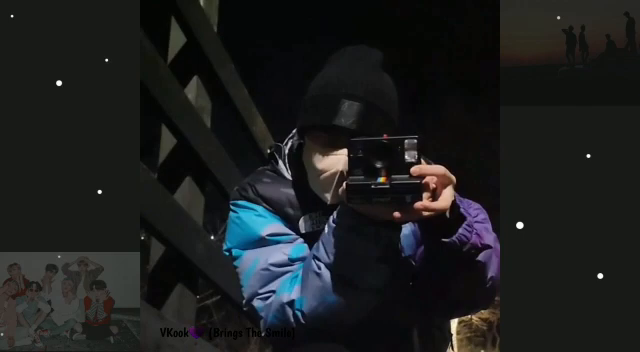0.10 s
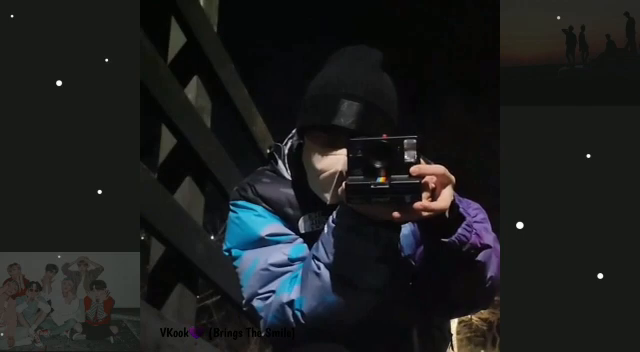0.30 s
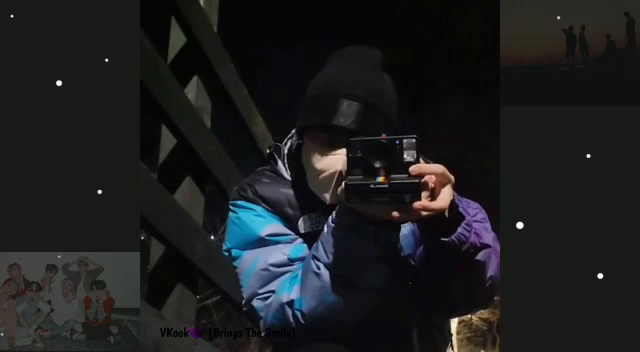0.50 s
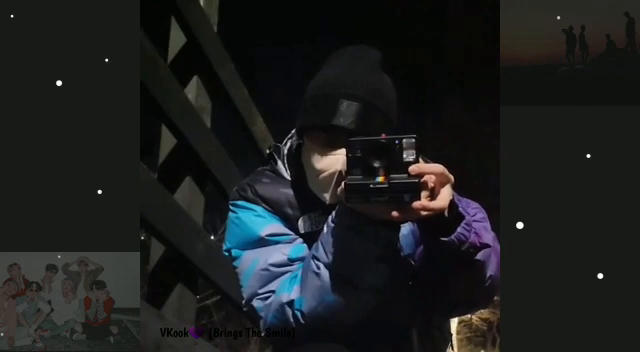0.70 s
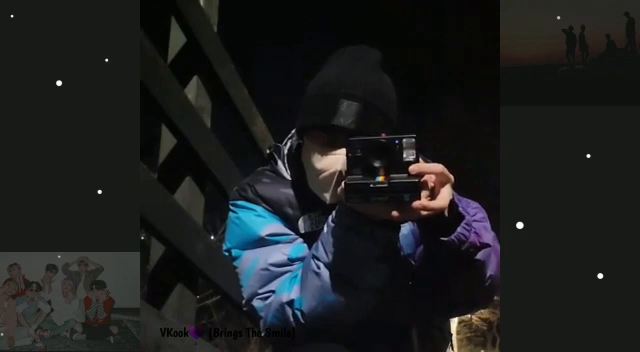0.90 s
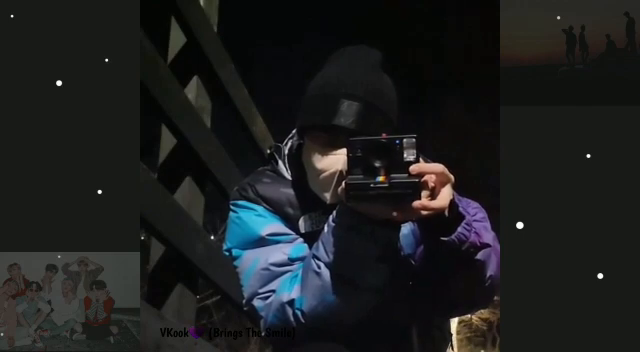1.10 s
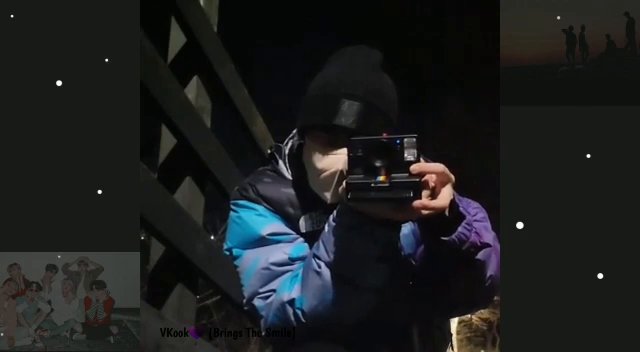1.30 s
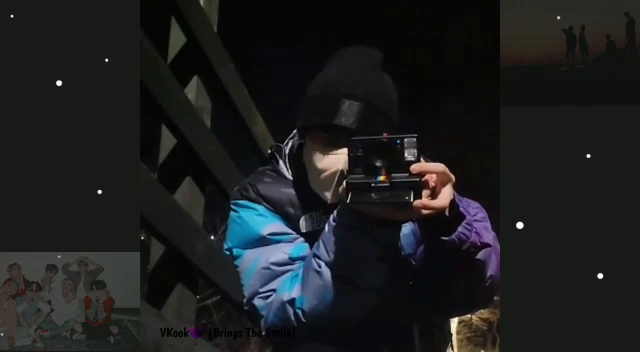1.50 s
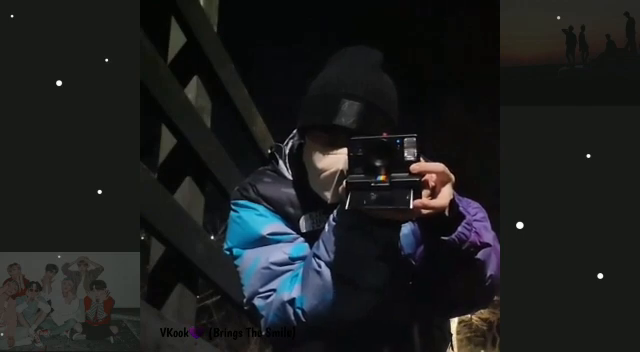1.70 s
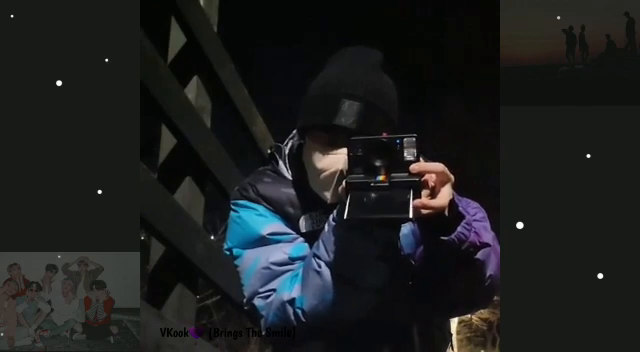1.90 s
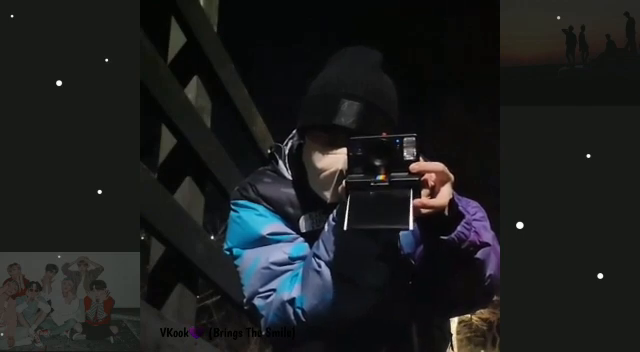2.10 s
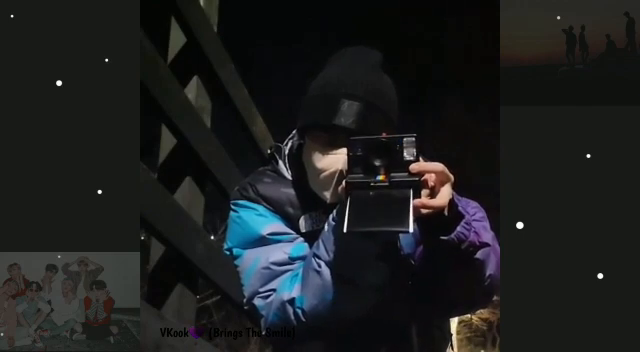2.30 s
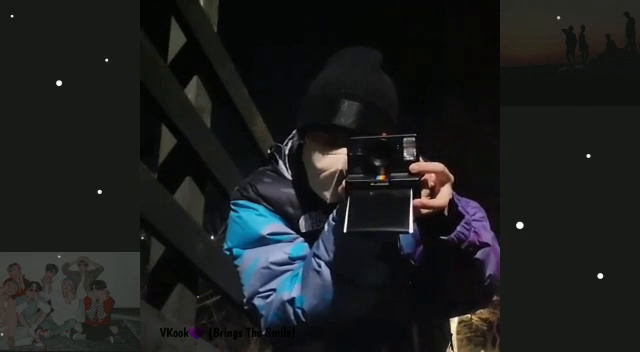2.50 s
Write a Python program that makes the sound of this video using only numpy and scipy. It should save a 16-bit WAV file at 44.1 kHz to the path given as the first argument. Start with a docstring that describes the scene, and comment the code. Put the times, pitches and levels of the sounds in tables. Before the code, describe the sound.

Instant camera ejecting a print: buzzy motor whine, sharp mechanical snap, lower strained whir, final clack

```python
"""A low outdoor rumble, then an instant camera's small geared motor spins up to a whine and ejects a print.
It labours as the rollers grip the print, presses it out, runs free and dies away: tooth harmonics,
gear lines, rattle and rubbing all follow one shaft speed and sound through the plastic case.
The mechanism snaps as the print is picked and clacks as it lets go: noise cracks plus ringing modes.
The distant rumble is filtered noise with low swells near 50 Hz, each a decaying sine."""
import sys
import numpy as np
from scipy import signal
from scipy.fft import rfft, irfft, next_fast_len
from scipy.io import wavfile

SR = 44100
rng = np.random.default_rng(int(sys.argv[2]) if len(sys.argv) > 2 else 0)


def wav_out(sig):
    """Save sig, one row per channel (or a flat mono array), as 16-bit PCM at SR to the path in sys.argv[1]."""
    wavfile.write(sys.argv[1], SR, np.round(np.clip(np.atleast_2d(sig).T, -1, 1) * 32767).astype(np.int16))


N = 116865
T_S = np.arange(N) / SR
PORT_LAG_S = 0.0002323


def undb(db):
    """Decibels to amplitude."""
    return 10 ** (np.asarray(db) / 20)


def unit(x):
    """Scale to an RMS of 1."""
    return x / np.sqrt(np.mean(x ** 2))


def curve(table, axis=1):
    """One table column, joined by straight lines in time."""
    rows = np.array(table)
    return np.interp(T_S, rows[:, 0], rows[:, axis])


def wander(hz):
    """Low-passed noise of RMS 1: smooth chance up to about the given rate."""
    lowpass = signal.butter(2, hz, fs=SR, output="sos")
    return unit(signal.sosfilt(lowpass, rng.standard_normal(N)))


def colour(x, table, axis=1):
    """Minimum-phase filter through the (frequency [Hz], level [dB]) points of one column."""
    rows = np.array(table)
    size = next_fast_len(N + 8192, real=True)
    hz = np.arange(size // 2 + 1) * SR / size
    gain_db = np.interp(np.log(hz + 1), np.log(rows[:, 0]), rows[:, axis])
    # folding the cepstrum onto positive time makes the filter causal
    cepstrum = irfft(np.log(undb(gain_db)), size)
    cepstrum[1:size // 2] *= 2
    cepstrum[size // 2 + 1:] = 0
    response = np.exp(rfft(cepstrum))
    return irfft(rfft(x, size) * response, size)[:N]


def lag(x):
    """Extra travel time to the left port."""
    return np.interp(T_S - PORT_LAG_S, T_S, x)


def radiate(pair, table):
    """Each port hears its own colour; the left one hears it a little later."""
    left = lag(colour(pair[0], table, axis=1))
    right = colour(pair[1], table, axis=2)
    return np.array([left, right])


def ports(source, apart):
    """Noise at two ports: power share `apart` is each one's own, the rest is common."""
    apart = np.clip(apart, 0, 1)
    common = source()
    own = np.array([source(), source()])
    return np.sqrt(1 - apart) * common + np.sqrt(apart) * own


def scatter(x, t60_s, db):
    """Diffuse reflections: decaying noise of given total level, different at each port."""
    t = np.arange(SR // 4) / SR
    tail = rng.standard_normal((2, len(t))) * np.exp(-np.log(1000) * t / t60_s)
    tail /= np.sqrt(np.sum(tail ** 2, axis=1, keepdims=True))
    return undb(db) * signal.fftconvolve(x, tail, axes=1)[:, :N]


# pinion tooth mesh rate: (time [s], rate [Hz])
MESH_RATE = [(.12, 1203), (.15, 1701), (.175, 1918), (.212, 2020), (.282, 2067), (.5, 2086), (.548, 2058),
             (.632, 2027), (.7, 2023), (.932, 2013), (.95, 1884), (.967, 1586), (1.0, 1498), (1.04, 1422),
             (1.07, 1302), (1.095, 1275), (1.14, 1314), (1.18, 1252), (1.225, 1423), (1.262, 1191),
             (1.3, 1345), (1.33, 1450), (1.37, 1464), (1.52, 1486), (1.65, 1515), (1.82, 1541), (2.0, 1594),
             (2.14, 1650), (2.228, 1630), (2.255, 1500), (2.28, 1166), (2.32, 1371), (2.37, 1959),
             (2.41, 2079), (2.47, 1919), (2.62, 1710)]
# drive strength: (time [s], whine and gear lines [dB], rattle [dB], rubbing [dB])
DRIVE_LEVELS = [(.108, -51, -48, -37), (.126, -18, -8, -6.5), (.17, -4.5, 0, -3.5), (.25, -7, 4.5, -3.5),
                (.47, -8, 2, -2.5), (.54, -1.5, 4, -0.5), (.7, -1, -0.5, -0.5), (.92, -1, -0.5, -0.5),
                (.957, 3.5, -10, -0.5), (1.06, -5.5, -4, -1.5), (1.18, -4.5, -18, -4.5),
                (1.29, -5.5, -12, -3.5), (1.38, -3, 2, -1.5), (1.6, -3, -1.5, -3), (1.83, -4, 0.5, -3.5),
                (2.0, -1.5, 4, -3.5), (2.2, 2, 3, -5), (2.28, -2, 3.5, -1), (2.36, -19, -2, -4.5),
                (2.43, -4, -1, -2.5), (2.53, -20, -6, -7), (2.63, -49, -29.5, -32)]
# radiation of the drive by the plastic case: (frequency [Hz], left [dB], right [dB])
CASE_COLOUR = [(148, -14, -1), (412, 6.5, -11), (740, 0.5, 7.5), (863, -4, -3), (1280, 6.5, 4.5),
               (1510, 0.5, 2.5), (1790, -19.5, -23.5), (1988, 2, 2.5), (2530, -18, -1.5), (2855, 3, -12.5),
               (3383, 9, 6.5), (3750, -9.5, 7), (3780, -2, 9), (4610, 3.5, -2), (4930, -4.5, 3),
               (5330, -7, -1.5), (5933, 7, 6.5), (6300, -3, -6.5), (6770, -2.5, -3), (7320, 5, -1),
               (7850, -14, -3), (7950, 1, 4), (8420, -13, -5.5), (8710, 3, -3.5), (9500, -17.5, -2),
               (9740, -1.5, 3), (10190, -17, -3), (10440, 2, 2), (11880, -3, 2), (12910, -10.5, -6.5),
               (13200, -46, -48.5)]
PINION_TEETH = 11
FREE_HZ, LOADED_HZ = 2050, 1655  # mesh rate without load, with the print in the rollers
SPEED_JITTER, JITTER_HZ = 0.00138, 30.45  # RMS fraction of speed, bandwidth
STALL_HZ, STALL_JUDDER, JUDDER_HZ = 1431.5, 0.109, 119.7  # judder grows as the mesh rate falls below STALL_HZ
WOBBLE = 0.12  # whine pulsing depth from the off-centre pinion
RATTLE_DB, RATTLE_APART = -56, 0.52
RATTLE_SLIP_TURNS, SLIP_HZ = 0.0009, 150  # RMS, bandwidth
RUB_DB, RUB_APART = -47, 0.34
CAVITY_T60_S, CAVITY_DB = 0.021, -1.5  # dense short ring inside the case


def motor():
    """One speed drives whine, gear lines, rattle and rubbing; the noisy two also ring inside the case."""
    hz = curve(MESH_RATE)
    load = np.clip((FREE_HZ - hz) / (FREE_HZ - LOADED_HZ), 0, 1)
    jitter = SPEED_JITTER * wander(JITTER_HZ)
    judder = STALL_JUDDER * np.maximum(1 - hz / STALL_HZ, 0) * wander(JUDDER_HZ)
    teeth = np.cumsum(hz * (1 + jitter + judder)) / SR
    turns = teeth / PINION_TEETH

    singing = whine(teeth, load) * (1 + WOBBLE * np.sin(2 * np.pi * turns))
    tones = (singing + gear_lines(turns, load)) * undb(curve(DRIVE_LEVELS, axis=1))

    slipping = turns + RATTLE_SLIP_TURNS * wander(SLIP_HZ)
    clatter = ports(lambda: rattle(slipping), RATTLE_APART)
    clatter = clatter * undb(RATTLE_DB + curve(DRIVE_LEVELS, axis=2))
    rub = ports(lambda: rubbing(turns), RUB_APART)
    rub = rub * undb(RUB_DB + curve(DRIVE_LEVELS, axis=3))

    direct = clatter + rub
    cavity = scatter(direct, CAVITY_T60_S, CAVITY_DB)
    grain = (direct + cavity) / np.hypot(1, undb(CAVITY_DB))
    return radiate(tones + grain, CASE_COLOUR)


# tooth-rate harmonics before drive and case: (multiple of mesh rate, running free [dB], under load [dB])
WHINE_HARMONICS = [(1, -61, -63.5), (2, -59.5, -53.5), (3, -66, -61.5), (4, -60, -51), (5, -60.5, -60.5),
                   (6, -75, -56), (7, -80, -63), (8, -73, -58)]
WHINE_ROUGH, ROUGH_PER_HARMONIC, ROUGH_HZ = 0.16, 0.13, 198
SWELL_DB, SWELL_HZ = 1.1, 12.5  # RMS, bandwidth; SWELL_HZ also serves the gear lines
FLUTTER, WHEEL_TEETH = 0.22, 24  # depth at full load, once per wheel turn


def whine(teeth, load):
    """Meshing-tooth harmonics swell and fade, rougher higher up; load shifts balance and adds flutter."""
    out = 0
    for k, free_db, loaded_db in WHINE_HARMONICS:
        k = round(k)
        rough = WHINE_ROUGH + ROUGH_PER_HARMONIC * k
        shake = rough * (wander(ROUGH_HZ) + 1j * wander(ROUGH_HZ)) / np.sqrt(2)
        db = free_db + load * (loaded_db - free_db) + SWELL_DB * wander(SWELL_HZ)
        out = out + undb(db) * np.real((1 + shake) * np.exp(2j * np.pi * k * teeth))
    flutter = 1 + FLUTTER * load * np.sin(2 * np.pi * teeth / WHEEL_TEETH)
    return np.sqrt(2) * out * flutter


# clean lines of uneven teeth, before load and drive: (multiple of shaft rate, level [dB])
SHAFT_LINES = [(13, -66.5), (17, -67), (18, -65.5), (19, -78), (21, -77), (23, -66), (25, -81), (41, -72),
               (53, -64)]
GEAR_SWELL_DB, GEAR_LOAD_DB = 5, -10.5  # RMS swell, change at full load


def gear_lines(turns, load):
    """Clean tones locked to the shaft swell and fade; load damps them."""
    out = 0
    for k, db in SHAFT_LINES:
        level = undb(db + GEAR_SWELL_DB * wander(SWELL_HZ))
        out = out + level * np.sin(2 * np.pi * (round(k) * turns + rng.random()))
    return np.sqrt(2) * out * undb(GEAR_LOAD_DB * load)


# spectrum of the uneven-tooth pattern: (multiple of shaft rate, relative level [dB])
RATTLE_ORDERS = [(3, -12), (5, -2), (6, -0.5), (7, -4.5), (8, -12), (10, -4.5), (13, -7.5), (15, 2),
                 (20, -5), (26, 0.5), (34, 0.5), (44, 3), (66, -2.5), (95, 2)]


def rattle(turns):
    """One fine pattern of tooth contacts repeats every shaft turn."""
    size = 2048
    orders = np.arange(size // 2 + 1)
    multiples, levels_db = np.array(RATTLE_ORDERS).T
    gains = undb(np.interp(orders, multiples, levels_db, left=-np.inf, right=-np.inf))
    gains = gains * (orders % PINION_TEETH > 0)  # mesh harmonics belong to the whine
    pattern = unit(irfft(gains * np.exp(2j * np.pi * rng.random(len(orders)))))
    return np.interp(turns, np.arange(size) / size, pattern, period=1)


# rubbing spectrum: (frequency [Hz], relative level [dB])
RUB_SPECTRUM = [(200, 1.5), (1500, -4), (3500, -1), (6000, -1.5), (11000, -0.5)]
RUB_PULSE, RUB_GRIT, GRIT_HZ = 0.19, 0.17, 680


def rubbing(turns):
    """Brushes and rollers hiss grittily, pulsing with each turn."""
    pulse = 1 + RUB_PULSE * np.sin(2 * np.pi * turns)
    grit = np.exp(RUB_GRIT * wander(GRIT_HZ))
    hiss = rng.standard_normal(N) * pulse * grit
    return unit(colour(hiss, RUB_SPECTRUM))


CRACK_APART = 0.35
TAIL_T60_S, TAIL_DB = 0.2, -8


def strikes(contacts, colours, modes, ring_db):
    """Each contact cracks briefly and sets the part ringing; nearby surfaces add a short tail."""
    force, ring = 0, 0  # force is in power
    for start_s, db, decay_s in contacts:
        age_s = np.maximum(T_S - start_s, 0)
        force = force + (T_S >= start_s) * undb(db) ** 2 * np.exp(-2 * age_s / decay_s)
    crack = np.sqrt(force) * ports(lambda: rng.standard_normal(N), CRACK_APART)
    for hz, db, t60_s in modes:
        keep = np.exp(-2 * np.log(1000) / (t60_s * SR))
        energy = signal.lfilter([1], [1, -keep], force + 1e-18)
        envelope = np.sqrt(energy / energy.max())
        tone = np.sin(2 * np.pi * (hz * T_S + rng.random()))
        ring = ring + undb(ring_db + db) * envelope * tone
    heard = radiate(crack + scatter(crack, TAIL_T60_S, TAIL_DB), colours)
    return heard + np.array([lag(ring), ring])


# pick contacts and bounces, before colour: (time [s], level [dB], decay time constant [s])
SNAP_CONTACTS = [(1.086, -36.5, 0.0012), (1.1022, -26.5, 0.0039), (1.1042, -18, 0.0012),
                 (1.1053, -20, 0.0011), (1.1066, -22.5, 0.0015), (1.1104, -27, 0.0029),
                 (1.116, -48, 0.0034), (1.123, -32.5, 0.002), (1.1382, -46, 0.0022)]
# snap radiation: (frequency [Hz], left [dB], right [dB])
SNAP_RADIATION = [(99, -7, -2), (335, 0, 1), (865, -3, -3), (1320, 7.5, 5), (1620, 1, -5.5),
                  (2310, -20, 13), (2730, 5.5, -3.5), (3650, -7, 4.5), (4900, -1.5, 1), (5900, 5.5, -12.5),
                  (6230, 5.5, 10), (7900, -1, -1.5), (9300, 2.5, -3), (10500, -6, 11), (11100, 12, -5),
                  (11600, 1, 2.5), (12800, 1, 1.5), (13400, -27, -20.5)]
# metal part modes: (frequency [Hz], level re ring [dB], T60 [s])
SNAP_RING = [(1242, 3, 0.15), (2200, 2, .12), (3810, -5.5, 0.26), (4730, -4, 0.084), (5380, 0, 0.062),
             (6100, -6, 0.065), (6400, -5, .08), (10800, -17, .07), (11200, -14, .08), (11610, -12, 0.064)]


def snap():
    """The spring-loaded pick snaps over and bounces; metal parts ring."""
    return strikes(SNAP_CONTACTS, SNAP_RADIATION, SNAP_RING, ring_db=-42)


# roller and flap knocks, before colour: (time [s], level [dB], decay time constant [s])
CLACK_CONTACTS = [(1.2325, -41.5, 0.0052), (1.438, -47, 0.0074), (2.327, -37, 0.0023),
                  (2.3293, -26, 0.0019), (2.3314, -23, 0.0013), (2.3365, -34, 0.0026), (2.351, -49, 0.0055)]
# clack radiation: (frequency [Hz], left [dB], right [dB])
CLACK_RADIATION = [(99, -28, 0), (352, -5, 7.5), (870, 1.5, 4.5), (1460, 2.5, 7), (2454.5, 4.5, 7),
                   (3130, 7.5, -2), (3400, -3, 1.5), (4340, 1, 7.5), (5270, -5, 2), (5560, -8, -13),
                   (7100, 2, 6), (8306, -9, -10), (9800, -2, -2), (10500, -13, 4.5), (12300, -21, -6),
                   (12700, 2, 2), (13200, -34, -14)]
# struck part modes: (frequency [Hz], level re ring [dB], T60 [s])
CLACK_RING = [(845, 5.5, 0.045), (967, 2.5, 0.04), (1205, -3, 0.086), (2930, -7, 0.046), (4580, -15, 0.07),
              (5400, 7, 0.041)]


def clack():
    """Rollers and flap knock against the case, which rings briefly."""
    return strikes(CLACK_CONTACTS, CLACK_RADIATION, CLACK_RING, ring_db=-43.5)


# low swells of the distant rumble: (time [s], envelope peak [dB], frequency [Hz])
RUMBLE_SWELLS = [(.235, -45.5, 49), (0.483, -44.5, 51), (1.362, -44, 56.5), (2.1, -52, 50.6)]
SWELL_RISE_S = 0.018


def rumble_swells():
    """Low swells of the distant rumble near 50 Hz: a few low cycles swell and die."""
    out = 0
    for start_s, db, hz in RUMBLE_SWELLS:
        age_s = np.maximum(T_S - start_s, 0)
        envelope = age_s / SWELL_RISE_S * np.exp(1 - age_s / SWELL_RISE_S)
        out = out + undb(db) * envelope * np.sin(2 * np.pi * hz * age_s)
    return out


# outdoor rumble density: (frequency [Hz], relative level per Hz [dB])
RUMBLE_SPECTRUM = [(20, -17), (33, -23), (42, -6.5), (52, 4), (63, -1), (85, -9.5), (130, -9), (200, -8),
                   (270, -10), (330, -16), (500, -23), (800, -28.5), (1500, -46.5), (3000, -67.5),
                   (13000, -66), (13500, -95)]
RUMBLE_DB, RUMBLE_SIDE_DB = -51.5, -12  # side is relative to mid


def rumble():
    """Low outdoor rumble from filtered noise, nearly the same at both ports."""
    mid = unit(colour(rng.standard_normal(N), RUMBLE_SPECTRUM))
    side = unit(colour(rng.standard_normal(N), RUMBLE_SPECTRUM))
    return undb(RUMBLE_DB) * (mid + undb(RUMBLE_SIDE_DB) * side * np.array([[1], [-1]]))


def scene():
    """Motor, snap and clack over the rumble and its swells."""
    return motor() + snap() + clack() + rumble_swells() + rumble()


TOP_HZ = 14200


def record(dry):
    """A steep elliptic low-pass cuts the top."""
    lowpass = signal.ellip(10, .2, 70, TOP_HZ, fs=SR, output="sos")  # ripple, stopband [dB]
    return signal.sosfilt(lowpass, dry)


dry = scene()
out = record(dry)
wav_out(out)
```